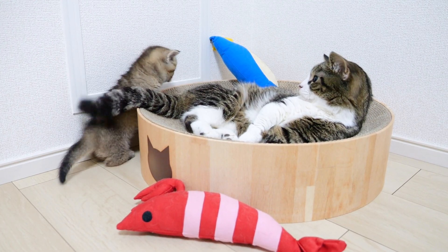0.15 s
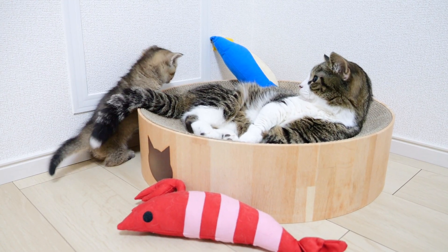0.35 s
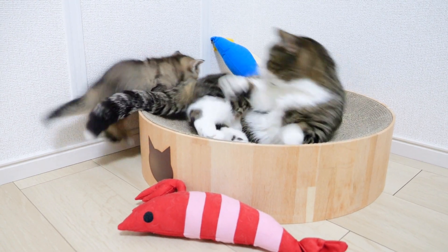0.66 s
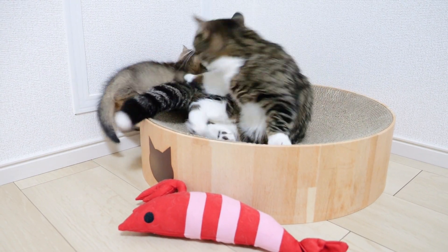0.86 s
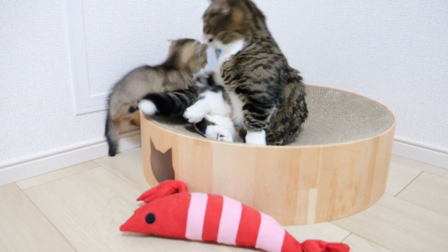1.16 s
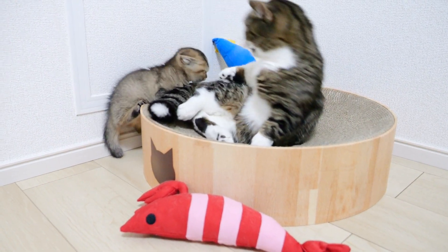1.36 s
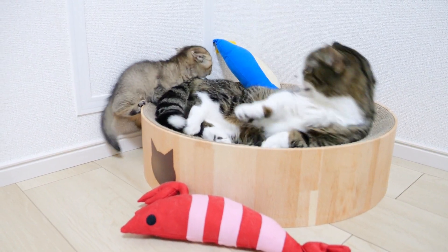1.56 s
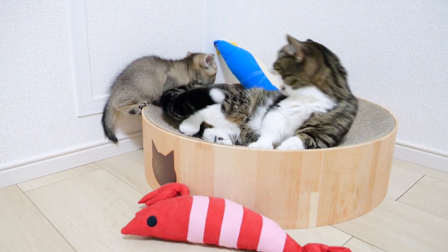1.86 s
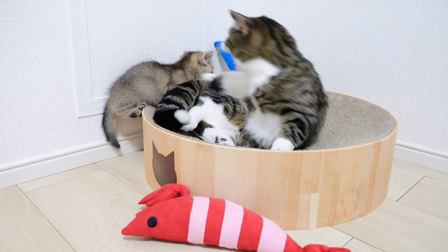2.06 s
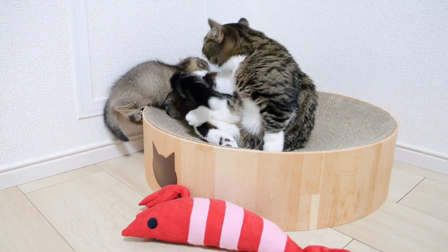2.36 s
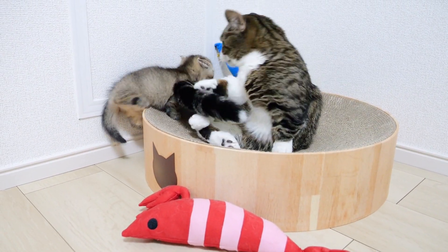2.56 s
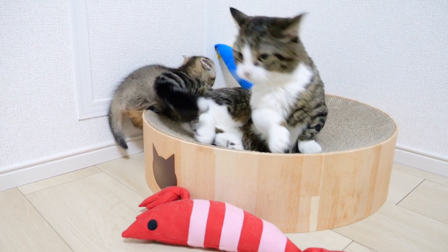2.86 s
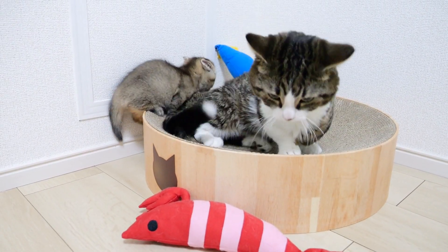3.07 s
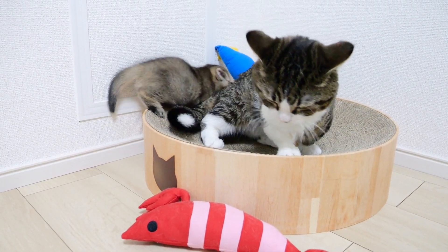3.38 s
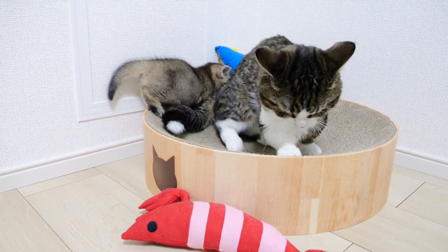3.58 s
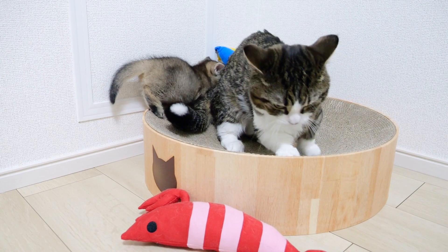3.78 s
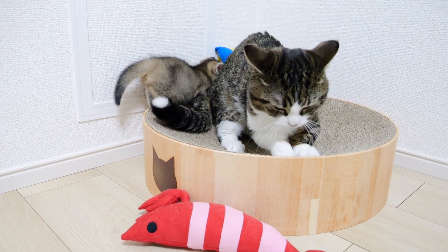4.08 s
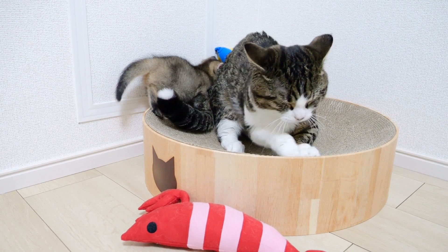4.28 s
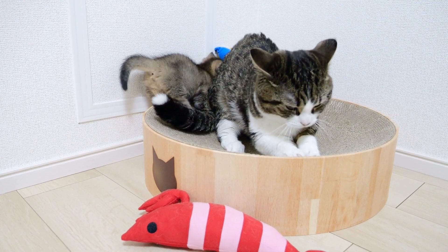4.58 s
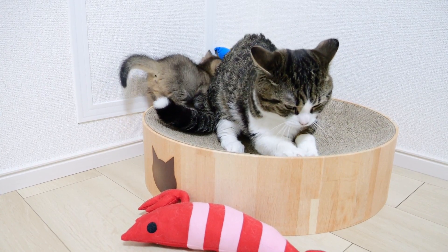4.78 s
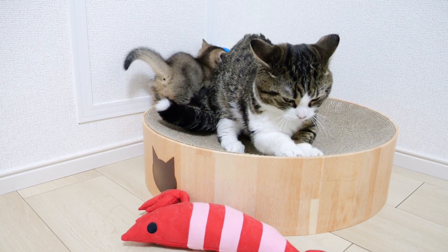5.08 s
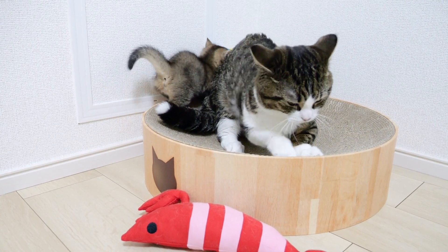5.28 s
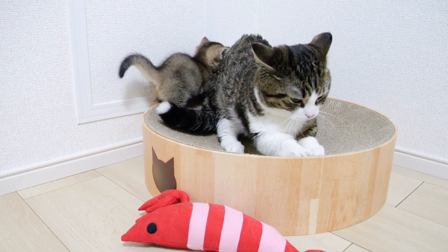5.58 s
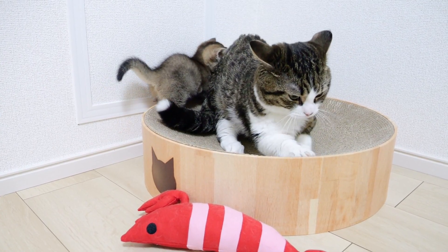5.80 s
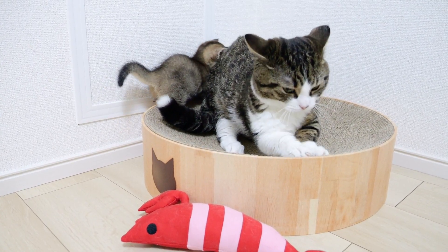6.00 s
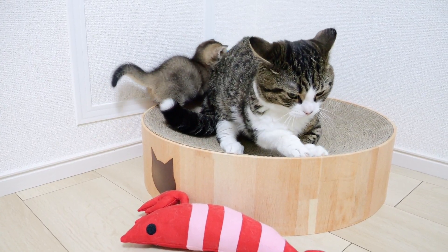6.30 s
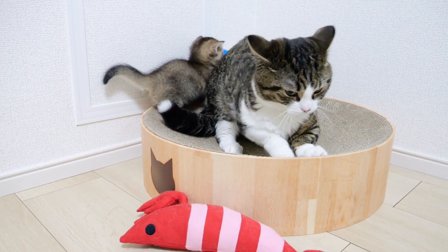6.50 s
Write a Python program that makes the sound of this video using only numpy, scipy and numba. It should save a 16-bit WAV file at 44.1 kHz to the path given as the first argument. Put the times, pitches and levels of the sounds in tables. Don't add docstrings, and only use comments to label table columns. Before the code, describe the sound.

Two cats tussle on a hollow scratching bed: light paw knocks, a raspy yowl, a long hiss, a tiny grunt, then sharp drumlike claw scratches.

```python
import sys
import numpy as np
from scipy import signal
from scipy.fft import rfft, irfft
from scipy.io import wavfile
from scipy.ndimage import uniform_filter1d
from numba import njit

SR = 44100
rng = np.random.default_rng(int(sys.argv[2]) if len(sys.argv) > 2 else 0)


def gain_from_db(level_db):
    decades = np.asarray(level_db, float) / 20
    return 10 ** decades


def store_wav(level_fs):
    pcm = np.round(np.clip(np.atleast_2d(level_fs), -1, 1) * 32767)
    wavfile.write(sys.argv[1], SR, pcm.T.astype(np.int16))


N = 293265

# pitch_hz, level_db (per Hz)
ROOM_TONE = [(76, -44), (130, -8), (308, -3.5), (339, -11), (382, -19), (429, 0), (2140, -18),
             (2400, -16.5), (2870, -25), (3220, -19.5), (3770, -26), (14000, -29)]
# pitch_hz, t60_s, echo_to_direct_db
WALLS = [(110, .35, -4), (250, .3, -4), (550, .4, -4.5), (1200, .38, -3), (2500, .38, -2), (5000, .38, -1),
         (9000, .36, -1), (13500, .3, -1)]

# pitch_hz, width_hz, level_db
PAD = [(442.6, 160, 1), (548, 101, 9.5), (627, 280, 1), (923, 130, 3)]
# pitch_hz, width_hz, level_db
BOX = [(81, 23, -12.5), (108.4, 20.5, -5.5), (162.6, 63, -0.5), (201, 59, 1.5), (272, 75, -3.5)]
# pitch_hz, width_hz, level_db
FLUTES = [(930, 224, 4), (1364, 635, 7), (1824, 1760, -0.5), (4290, 1330, -9)]
# pitch_hz, width_hz, level_db
EDGE = [(1190, 170, -1.5), (1600, 140, -9), (3900, 150, -12)]

# peak_s, level_db, length_s, box_weight_db, fur_hiss_db
STROKES = [(0.704, -52.5, 0.1, -8, -10), (0.867, -60.5, 0.29, -10, -10), (1.036, -54, 0.21, -22, -11),
           (1.247, -62, .2, -4, -31), (1.658, -56.5, 0.22, -21, -20.5), (1.932, -77.5, 0.6, 2.5, 12),
           (2.13, -53.5, 0.31, -8, -2), (2.34, -55, 0.47, -8, -22), (2.56, -63.5, 0.74, -18, -25),
           (3.078, -59.5, 0.7, -8, -13), (3.297, -74, 0.69, -2, -16), (3.57, -64, 0.66, -14, -14),
           (3.883, -66, 0.61, -7, -16), (4.26, -58.5, 0.51, -10, -16), (4.679, -58.5, 0.22, -15, -15.5),
           (5.21, -60, 1, -14, -22), (5.734, -53.5, 0.1, -6, -32)]
# peak_s, level_db, rise_s, fall_s, pitch_hz
SQUEAKS = [
    (2.9, -80, .05, .05, 4000),
    (2.9, -78, .05, .07, 1450),
    (5.24, -80, .04, .04, 2020),
    (5.525, -86, .05, .03, 3620),
    (5.985, -73, .05, .05, 2260),
    (6.472, -75, .035, .035, 3110),
]
# start_s, level_db
THUDS = [(0.705, -53.5), (0.944, -65), (1.234, -73), (1.338, -63), (1.413, -65), (1.588, -57), (1.668, -64),
         (1.785, -58), (2.088, -85), (2.161, -75), (4.234, -54), (4.743, -48), (4.903, -42.5), (5.145, -64),
         (5.667, -42.5), (5.845, -40.5), (6.272, -63), (6.299, -46.5), (6.503, -33.5)]
# start_s, level_db
FLICKS = [(2.8523, -46.5)]
# start_s, pad_ring_db, box_thud_db, snap_db, sharpness_db
PAWS = [(0.647, -50.5, -61, -64.5, -8), (0.656, -48.5, -59, -60, -15), (0.712, -64, -59, -59, -1),
        (0.761, -45, -48.5, -59, 0), (0.829, -50.5, -57, -62, -2), (1.006, -69, -63, -56, -9),
        (2.237, -46.5, -61.5, -47, -22), (2.853, -55, -55, -69.5, 10.5), (2.867, -53, -62, -63, -17),
        (2.919, -57, -66, -76, 2), (2.981, -55, -78, -81, -8), (3.079, -46, -56.5, -62, -4.5),
        (3.163, -58, -54.5, -67, -4), (3.224, -54, -61, -64, -1.5), (3.411, -58, -80, -63, -18),
        (3.486, -57, -78, -68, -15), (3.571, -51.5, -62, -64.5, 1.5), (3.743, -52.5, -62.5, -59.5, -4.5),
        (3.832, -50.5, -55.5, -64, -14.5)]
# start_s, pad_ring_db, snap_db, sharpness_db, snap_ring_hz
CLAWS = [(4.105, -31, -40.5, -9, 2380), (4.232, -43.5, -58, -6, 1730), (4.334, -50, -76, -3, 2450),
         (4.342, -37, -49.5, 3, 1540), (4.739, -43, -58.5, 0, 2500), (4.751, -44, -53, -10, 1660),
         (4.902, -25.5, -35, -9.5, 1660), (5.144, -54, -53.5, -1.5, 1250), (5.281, -26, -39, -10.5, 1870),
         (5.308, -32.5, -60, -11, 2010), (5.559, -34.5, -39, -10.5, 2260), (5.593, -40, -46.5, -5, 2000),
         (5.678, -29.5, -39.5, -4, 3780), (5.851, -26.5, -41, -6, 1650), (6.123, -35.5, -35, -10.5, 2030),
         (6.298, -31.5, -42.5, 5, 2100), (6.307, -61, -40, -33, 3380), (6.5128, -53, -26, -12, 4280),
         (6.501, -29.5, -26.5, -6.5, 2000), (6.5127, -23, -26.5, -3, 1880)]

# start_s, level_db, tongue_hz, lips_db, teeth_db
HISS = [
    (1.78, -71.5, 890, -8, -6),
    (1.9, -61.5, 1000, -34, -23),
    (2.03, -52.5, 1065, -21, -10),
    (2.134, -55, 1140, -2, -21),
    (2.25, -55, 930, -13, -10),
    (2.35, -54.5, 1000, -7, -5.5),
    (2.466, -65, 1130, 3, -9),
    (2.554, -74.5, 900, 7.5, 5),
    (2.66, -98, 890, -4, -15),
]
# pitch_hz, width_hz, level_db
HISS_MOUTH = [(837, 91, 5), (2000, 1130, -7.5)]
# pitch_hz, width_hz, level_db
TEETH = [(4570, 6900, 4.5), (7500, 820, 10), (9900, 2400, -13)]

# start_s, pitch_hz, low_hz, high_hz, high_share_db
GRUNT = [
    (2.565, 412.5, 450, 910, -2),
    (2.591, 463, 467, 890, -6),
    (2.62, 477, 464, 900, -11),
]
# peak_s, level_db, rise_s, fall_s (times per 20 dB)
GRUNT_PUSHES = [(2.591, -42.5, 0.022, 0.021)]
# start_s, pitch_hz, low_hz, high_hz, high_share_db
CRY = [
    (1.0, 427, 1750, 2540, -22),
    (1.05, 392.7, 1870, 2650, -9),
    (1.11, 479.3, 2050, 2830, -4.5),
    (1.18, 507.7, 1770, 2720, -8.5),
    (1.24, 495.8, 1530, 2500, -45),
    (1.272, 472, 1470, 2470, 6.5),
    (1.31, 525.9, 1660, 2240, 0),
    (1.376, 483.3, 1915, 2516, 0),
    (1.56, 479.8, 1580, 2360, 0),
]
# peak_s, level_db, rise_s, fall_s (times per 20 dB)
CRY_PUSHES = [(1.042, -46, .045, .05), (1.112, -42, .04, .3), (1.165, -40, .1, .3), (1.233, -33, .07, .025),
              (1.276, -34, .025, .06), (1.312, -43, .1, .08), (1.378, -30.5, .07, .06),
              (1.45, -50, .3, .075)]
# peak_s, level_db, rise_s, fall_s (times per 20 dB)
PUFFS = [
    (1.05, -87, .2, .3),
    (1.262, -64.5, 0.12, 0.039),
    (1.385, -67, 0.051, 0.071),
    (1.48, -57, 0.055, 0.043),
]
# pitch_hz, width_hz, level_db
THROAT = [(480, 740, -29), (1080, 670, -17), (252, 64, -25.5), (2000, 400, -49)]

AIR_DB, AIR_SWELL_DB, AIR_SIDE_HZ = -70, .8, 2500
HUM_HZ, HUM_DB, HUM_WAVER_DB = 99, -77.5, 2
ROOM_DELAY_S, SIDE_HZ, SIDE_TOP = 0.0063, 3180, 0.45
SHIFT_S, ECHO_SETS = .23, 5

RUB_GRAIN_DB, STROKE_RISE = 4, 0.6
DRAG_LATE_S, DRAG_DB, DRAG_S, DRAG_BOX_DB, DRAG_FUR_DB = 0.021, -15.5, .3, -11.5, -19
PUSH_S, THUD_S, CLAW_BOX_DB = .0005, .001, -20
PLUCK_S, PLUCK_HZ, PLUCK_SCATTER = .0037, 535, .08
TEAR_S, RUSTLE_TAIL_S, RUSTLE_DB = 0.0011, .05, -66
SNAP_RING_DB, SNAP_WIDTH_HZ = 32.5, 650
SNAP_HZ, SNAP_HZ_PER_DB, SNAP_LOW_HZ = 2450, 70, 1600

HISS_FLICKER_DB, GAP_HZ, GAP_DB = 2.2, 5150, -7
LIPS_HZ, LIPS_LIFT_HZ, LIPS_CLOSE_S, LIPS_GLIDE_S = 2780, 550, 2.48, .03
MOUTH_WIDTH_HZ, FLUTTER_HZ, FLUTTER, ROUGH = 260, 95, 1.2, .56
RASP_HZ, RASP_SHIFT, RASP_REST_HZ, RASP_DB, RASP_GROWTH, SPIT_DB = 3800, 1.6, 1750, -19, 0.61, -34.5

CAPSULE_DB, MIC_TOP_HZ, TOP_HZ = -92, 10480, 15600


@njit
def svf(x, hz, width):
    y, b, l = np.empty(len(x)), 0., 0.
    for i in range(len(x)):
        g, k = np.tan(np.pi * hz[i] / SR), width / hz[i]
        v = (b + g * (x[i] - l)) / (1 + g * (g + k))
        b, l, y[i] = 2 * v - b, l + 2 * g * v, k * v
    return y


def band(x, hz, width):
    return svf(x + 1e-18, hz * np.ones(len(x)), float(width))


def body(x, modes):
    return sum((-1) ** k * gain_from_db(db) * band(x, hz, width) for k, (hz, width, db) in enumerate(modes))


def unit(x):
    return x / np.sqrt(np.mean(x ** 2))


def walk(rate, size=N):
    hold = int(SR / rate)
    steps = np.repeat(rng.standard_normal(size // hold + 1), hold)
    return unit(uniform_filter1d(uniform_filter1d(steps, hold), hold)[:size])


def read(table):
    s, *columns = np.transpose(table)
    t = np.arange(s[0], min(s[-1], N / SR - 1 / SR), 1 / SR)
    gate = np.clip(np.minimum(t - s[0], s[-1] - t) / 0.0027, 0, 1)
    return int(s[0] * SR), gate, [np.interp(t, s, column) for column in columns]


def place(x, start):
    return np.pad(x, (start, N))[:N]


def contact(t, push_s):
    return t / push_s * np.exp(-t / push_s) / (push_s * SR)


def swells(t, rows):
    power = 0
    for peak_s, db, rise, fall in rows:
        drop = np.maximum((peak_s - t) / rise, (t - peak_s) / fall)
        power = power + gain_from_db(db - 20 * drop) ** 2
    return np.sqrt(power)


def spread(hz, width, side_hz, top, size):
    mid, side = (unit(band(band(rng.standard_normal(size), hz, width), hz, 0.93 * width)) for _ in range(2))
    return mid + min(hz / side_hz, top) * side * np.array([[1], [-1]])


def air():
    table_hz, table_db = np.transpose(ROOM_TONE)
    swell = walk(0.23)
    tone = 0
    for hz in 140 * 2 ** np.arange(0, 6.8, .5):
        level_db = np.interp(np.log(hz), np.log(table_hz), table_db)
        drift_db = AIR_SWELL_DB * swell + 0.7 * walk(8.3)
        tone = tone + gain_from_db(level_db + drift_db) * np.sqrt(hz) * spread(hz, hz / 2, AIR_SIDE_HZ, 0.54, size=N)
    cycles = np.cumsum(HUM_HZ * (1 + 0.0159 * walk(10))) / SR
    hum = np.sqrt(2) * gain_from_db(HUM_WAVER_DB * walk(5.1)) * np.sin(2 * np.pi * cycles)
    return gain_from_db(AIR_DB) * unit(tone) + gain_from_db(HUM_DB) * hum


def room(x):
    t = np.arange(SR // 2) / SR
    rise = np.clip(t / ROOM_DELAY_S, 0, 1) ** 2
    tails = 0
    for hz, t60, db in WALLS:
        noise = spread(hz, 0.9 * hz, SIDE_HZ, SIDE_TOP, size=ECHO_SETS * len(t)).reshape(2, ECHO_SETS, -1)
        share = np.sqrt(2 * np.log(1e6) * hz / t60) / SR
        tails = tails + gain_from_db(db - 60 * t / t60) * share * noise
    away = (np.arange(N) / SR / SHIFT_S - np.arange(ECHO_SETS)[:, None] + 1) % ECHO_SETS - 1
    near = np.cos(np.pi / 2 * np.clip(away, -1, 1))
    return signal.fftconvolve((x * near)[None], rise * tails, axes=2).sum(axis=1)[:, :N]


def rubbing():
    t = np.arange(N) / SR
    rows = [(s + DRAG_LATE_S, snap_db + DRAG_DB, DRAG_LATE_S, DRAG_S, DRAG_BOX_DB, DRAG_FUR_DB)
            for s, _, snap_db, _, _ in CLAWS]
    rows += [(s, db, STROKE_RISE * length, length, box_db, fur_db) for s, db, length, box_db, fur_db in STROKES]
    on_pad = swells(t, [(s, db, rise, fall) for s, db, rise, fall, _, _ in rows])
    on_box = swells(t, [(s, db + box_db, rise, fall) for s, db, rise, fall, box_db, _ in rows])
    on_fur = swells(t, [(s, db + fur_db, rise, fall) for s, db, rise, fall, _, fur_db in rows])
    grain_db = RUB_GRAIN_DB * np.minimum(rng.exponential(size=N), 4.5) + 1.5 * walk(25)
    grain = rng.standard_normal((3, N)) * gain_from_db(grain_db)
    pad = unit(body(grain[0], PAD) + gain_from_db(-10) * body(grain[0], FLUTES))
    box = unit(body(grain[1], BOX))
    fur = unit(band(grain[2], 7730, 7100))
    return gain_from_db(-5.5) * on_pad * pad + gain_from_db(2.5) * on_box * box + gain_from_db(-5.5) * on_fur * fur


def squeaks():
    t, waver = np.arange(N) / SR, 1 + 0.0086 * walk(30)
    return sum(swells(t, [row]) * np.sqrt(2) * np.sin(2 * np.pi * np.cumsum(hz * waver) / SR)
               for *row, hz in SQUEAKS)


def tearing(t):
    chance = rng.standard_normal((2, len(t)))
    burst = t / TEAR_S * np.exp(1 - t / TEAR_S)
    rustle = gain_from_db(RUSTLE_DB + 4.1 * chance[1]) * np.exp(-t / RUSTLE_TAIL_S)
    tear = rfft(chance[0] * (burst + rustle))
    level = np.sqrt(uniform_filter1d(np.abs(tear) ** 2, size=30))
    slips = irfft(tear / level, len(t)) * np.exp(-t / .05)
    return slips / np.sqrt(np.sum(slips ** 2))


def plucked_patch(t, ring_db, ring_hz):
    ring = gain_from_db(ring_db) * band(contact(t, .00005), ring_hz, SNAP_WIDTH_HZ)
    hz = PLUCK_HZ * (1 + PLUCK_SCATTER * np.tanh(rng.standard_normal()))
    fade = 2 * t / PLUCK_S * np.exp(1 - 2 * t / PLUCK_S)
    return ring + np.sin(2 * np.pi * hz * t) * fade


def blows():
    t = np.arange(int(.2 * SR)) / SR
    pluck, pad, box, snap, tick = np.zeros((5, N + len(t)))
    hits = [(*row, max(SNAP_HZ + SNAP_HZ_PER_DB * row[-1], SNAP_LOW_HZ)) for row in PAWS]
    hits += [(s, pad_db, pad_db + CLAW_BOX_DB, *rest) for s, pad_db, *rest in CLAWS]
    for s, pad_db, box_db, snap_db, sharp_db, ring_hz in hits:
        span = slice(int(s * SR), int(s * SR) + len(t))
        slips = tearing(t)
        pluck[span] += gain_from_db(pad_db) * plucked_patch(t, SNAP_RING_DB + snap_db - pad_db, ring_hz)
        pad[span] += gain_from_db(pad_db) * contact(t, PUSH_S)
        box[span] += gain_from_db(box_db) * contact(t, THUD_S)
        snap[span] += gain_from_db(snap_db) * slips
        tick[span] += gain_from_db(snap_db + sharp_db) * slips
    for s, db in THUDS:
        box[int(s * SR):int(s * SR) + len(t)] += gain_from_db(db) * contact(t, THUD_S)
    flick = sum(place(gain_from_db(db + 39) * body(contact(t, .00004), EDGE), int(s * SR)) for s, db in FLICKS)
    drum = gain_from_db(46.5) * body(pad[:N], PAD) + gain_from_db(61.5) * body(box[:N], BOX)
    edges = gain_from_db(30) * body(snap[:N], FLUTES) + gain_from_db(21) * band(tick[:N], 6470, 6500)
    return gain_from_db(2) * pluck[:N] + drum + edges + flick


def hiss():
    start, gate, (db, tongue_hz, lips_db, teeth_db) = read(HISS)
    t = (start + np.arange(len(gate))) / SR
    closing = np.clip((t - LIPS_CLOSE_S) / LIPS_GLIDE_S, 0, 1)
    flicker = np.array([walk(34.9, size=N // 4)[:len(gate)] for _ in range(3)])
    noise = rng.standard_normal((3, len(gate))) * gain_from_db(HISS_FLICKER_DB * flicker)
    tongue = band(band(noise[0], tongue_hz, 380), tongue_hz, 800)
    mouth = unit(tongue + body(noise[0], HISS_MOUTH))
    whistle = unit(band(noise[1], LIPS_HZ + LIPS_LIFT_HZ * closing, 420))
    gap = closing * gain_from_db(GAP_DB) * unit(band(noise[1], GAP_HZ, 400))
    teeth = unit(body(noise[2], TEETH))
    breath = mouth + gain_from_db(lips_db) * (whistle + gap) + gain_from_db(teeth_db) * teeth
    return place(breath * gain_from_db(db) * gate, start)


def voice(table, pushes, puffs=()):
    start, gate, (hz, low_hz, high_hz, high_db) = read(table)
    t = (start + np.arange(len(gate))) / SR
    effort = swells(t, pushes)
    noise = rng.standard_normal((4, len(gate)))
    wobble = walk(198.8, size=N // 8) + walk(45.13, size=N // 8)
    cycles = np.cumsum(hz * (1 + 0.0511 * ROUGH * wobble[:len(gate)])) / SR
    folds = sum(np.cos(2 * np.pi * k * cycles) for k in range(1, 9)) / 2
    source = folds + ROUGH * .5 * noise[0] * np.exp(-(cycles % 1) / .4)
    flutter = [1 + FLUTTER * ROUGH * unit(band(n, FLUTTER_HZ, 49)) for n in noise[1:]]
    low, high = (unit(band(band(source * f, centre, MOUTH_WIDTH_HZ), centre, 2 * MOUTH_WIDTH_HZ))
                 for f, centre in zip(flutter, (low_hz, high_hz)))
    share = np.clip(gain_from_db(high_db), 0, .98)
    mouth = np.sqrt(1 - share ** 2) * low - share * high + 3 * body(source * flutter[2], THROAT)
    if puffs:
        rasp_hz = np.minimum(RASP_HZ - RASP_SHIFT * (low_hz - RASP_REST_HZ), 4100)
        rasp = unit(band(band(source * flutter[2], rasp_hz, 700), rasp_hz, 1100))
        spit = unit(flutter[2] * band(band(noise[0], 5330, 3500), 3600, 3000))
        puff = swells(t, puffs) / effort
        mouth += (gain_from_db(RASP_DB) * (effort / effort.max()) ** RASP_GROWTH + gain_from_db(-2) * puff) * rasp
        mouth += (gain_from_db(SPIT_DB) + puff) * spit
    return place(mouth * effort * gate, start)


def scene():
    cry = gain_from_db(-2) * voice(CRY, CRY_PUSHES, PUFFS)
    grunt = gain_from_db(-2.5) * voice(GRUNT, GRUNT_PUSHES)
    near = cry + grunt + gain_from_db(-1.5) * hiss() + blows() + rubbing() + squeaks()
    return near + room(near) + air()


def roll_off(x):
    return signal.sosfilt(signal.butter(12, 15770, fs=SR, output="sos"), x)


def record(dry):
    x = signal.sosfilt(signal.butter(2, [60, MIC_TOP_HZ], "bandpass", fs=SR, output="sos"), dry)
    x = signal.sosfilt(signal.butter(2, 55, "highpass", fs=SR, output="sos"), x)
    x = x + gain_from_db(CAPSULE_DB) * rng.standard_normal(x.shape)
    x = signal.sosfilt(signal.ellip(8, .2, 70, TOP_HZ, fs=SR, output="sos"), x)
    return roll_off(x)


dry = scene()
out = record(dry)
store_wav(out)
```